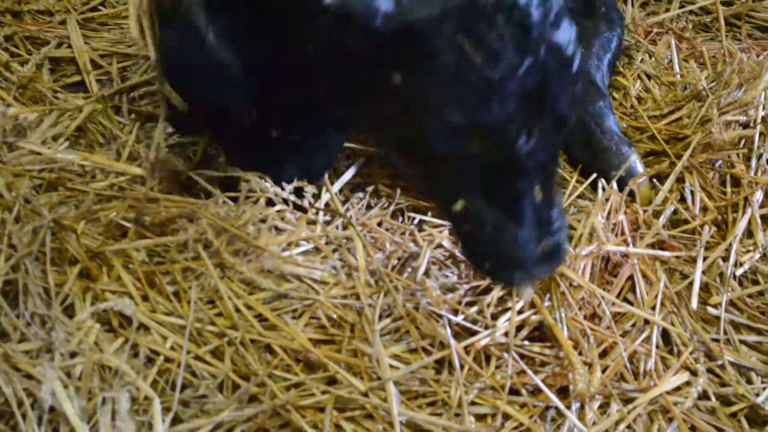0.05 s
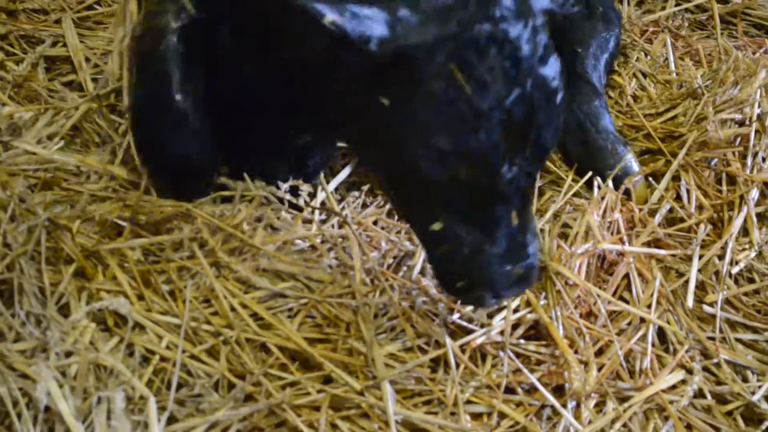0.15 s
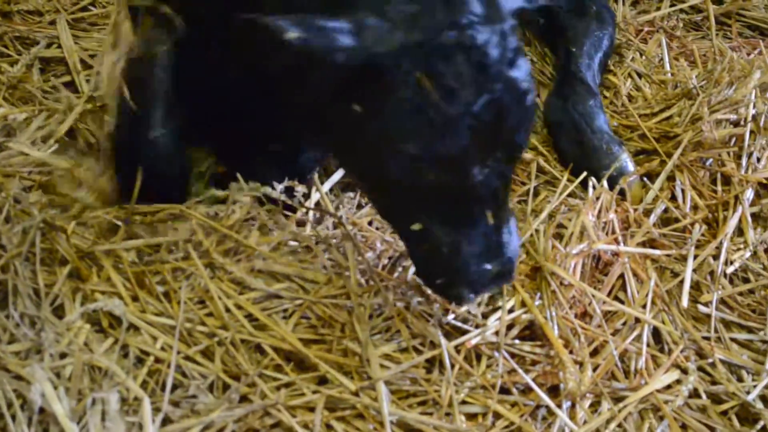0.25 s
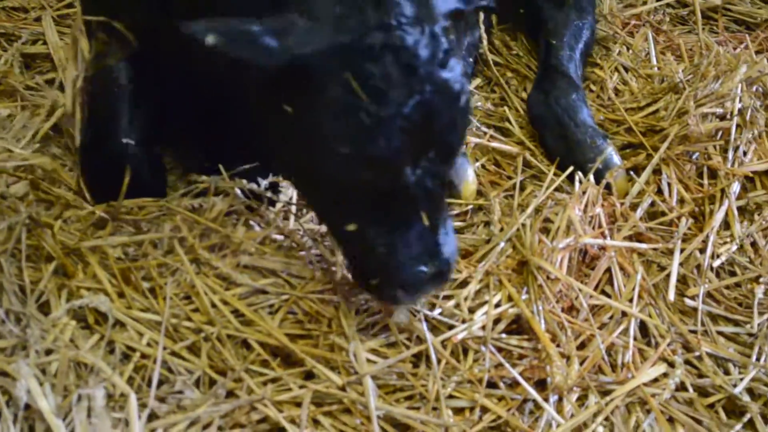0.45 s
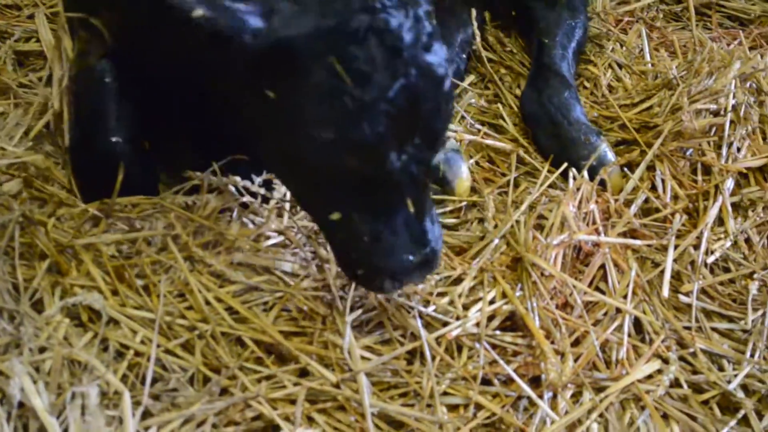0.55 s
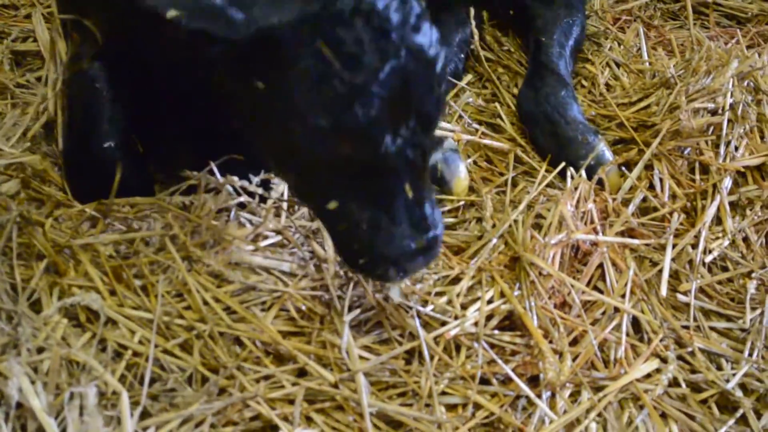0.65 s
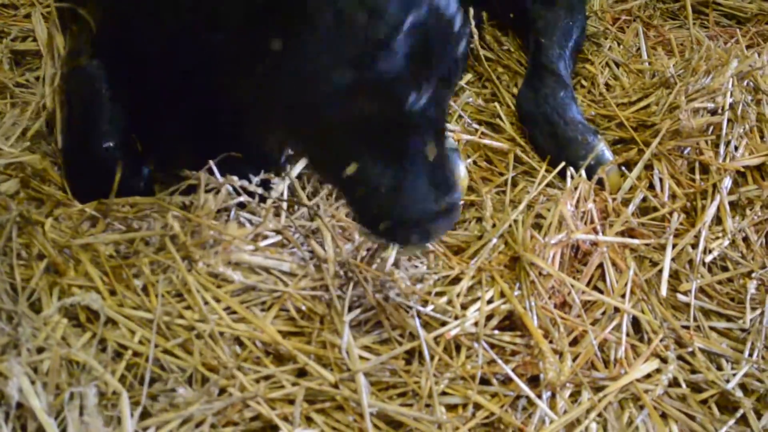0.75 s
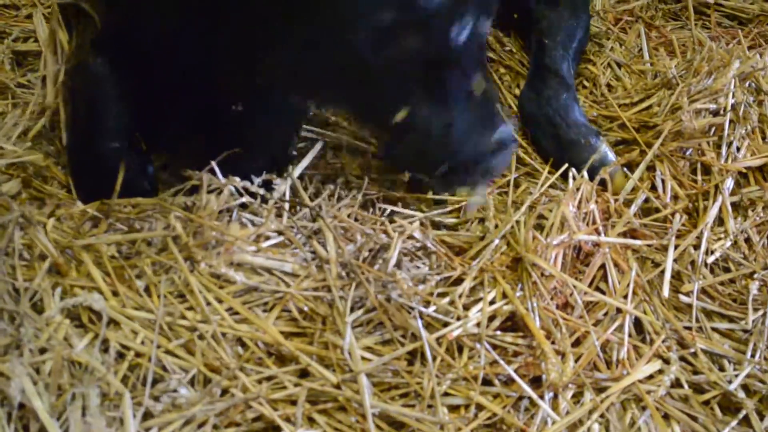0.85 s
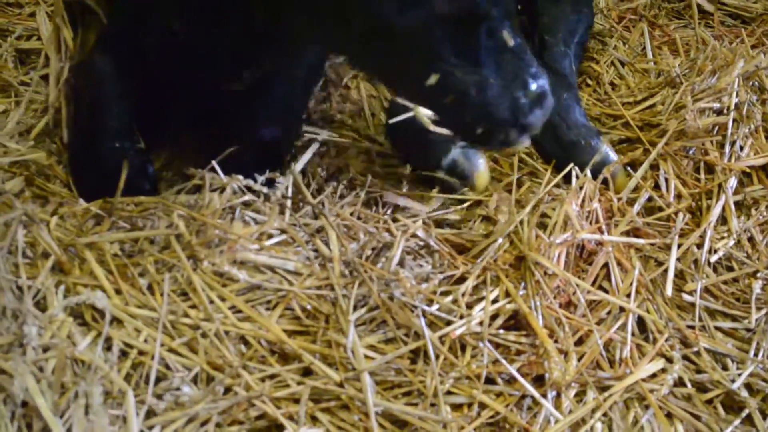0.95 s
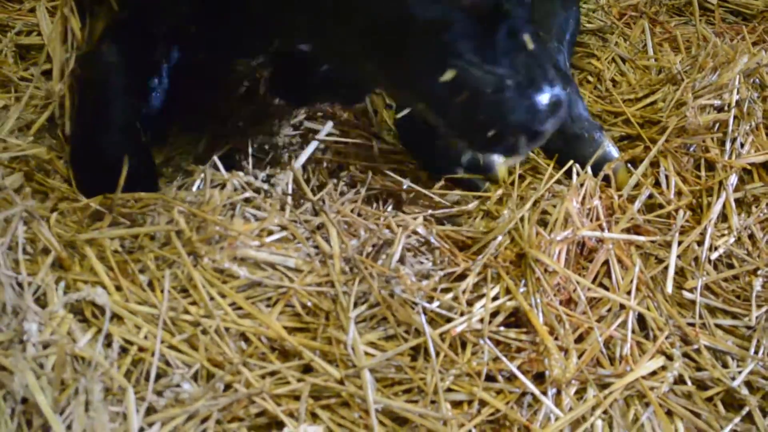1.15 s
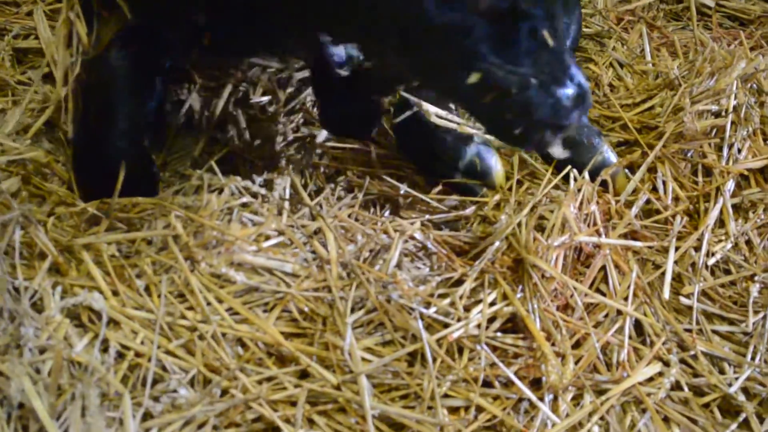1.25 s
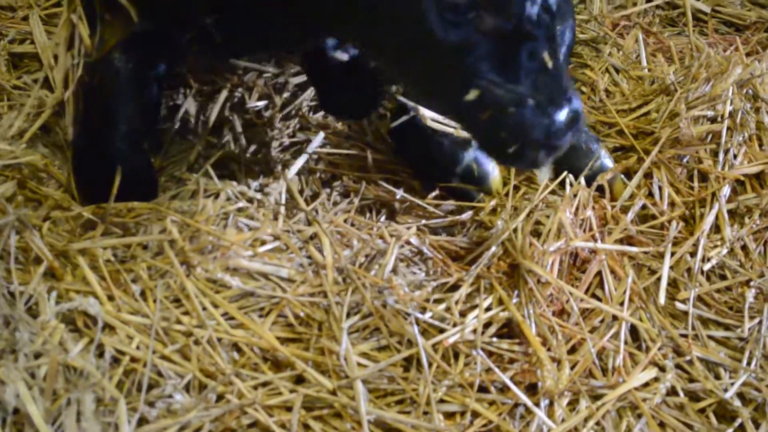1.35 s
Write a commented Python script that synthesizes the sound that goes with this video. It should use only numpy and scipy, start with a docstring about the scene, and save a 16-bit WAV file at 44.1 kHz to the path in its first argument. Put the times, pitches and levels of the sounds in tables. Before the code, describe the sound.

One heavy wooden thud echoes in a barn while a calf softly rustles straw.

```python
"""A thin ring, perhaps a gate, fades in a quiet barn while a calf shifts close by, crunching the straw.
A quarter second in comes one low, hollow thud, as of something heavy striking a wooden partition:
the boards ring under a short chatter of blows, and the barn answers with a booming tail.
As it dies away, duller bumps and scuffs come from the pen and the straw keeps rustling."""
import sys
import numpy as np
from scipy import signal
from scipy.fft import rfft, irfft
from scipy.io import wavfile

SR = 44100
rng = np.random.default_rng(int(sys.argv[2]) if len(sys.argv) > 2 else 0)


def bounce(signal):
    """Save signal as a 16-bit WAV file at the path given by the first command-line argument."""
    frames = np.transpose(np.atleast_2d(signal))
    limited = np.clip(frames, -1, 1)
    pcm = np.round(limited * 32767).astype(np.int16)
    wavfile.write(sys.argv[1], SR, pcm)


N = 61739

# The blows of the thud. Each row: start in seconds, relative level in dB, contact time in seconds.
THUD_BLOWS = [(0.246, -7.5, 0.0014), (0.2499, 4, 0.0014), (0.2562, -4.5, 0.00036), (0.2701, -3, 0.0012),
              (0.2881, -15.5, 0.00095), (0.3044, -1, 0.0021), (0.3262, -5, 0.0016), (0.4011, -7, 0.00272)]


def thud():
    """A soft, heavy blow and its chatter set the wooden partition ringing."""
    # The boards' modes. Each row: pitch in Hz, relative level in dB, 60 dB decay time in seconds.
    board_modes = [(86, -18, 1.0), (134, -11, .6), (147.5, -15, .22), (164, -15, .85), (199, -11, .62),
                   (233, -10, .66), (273, -3, .32), (335, -17, .45), (495, 6, .02), (670, -8, .22),
                   (787, -7, .14), (950, -5, .04), (1075, -2, .09)]
    force = 0
    for start, db, contact in THUD_BLOWS:
        pulse = np.sin(np.pi * np.minimum(since(start) / contact, 1))
        force = force + undb(db) * pulse / pulse.sum()
    boards = resonate(force, board_modes)
    return undb(-12.5) * highpass(boards, hz=102)  # the boards radiate little deep bass


def barn_boom():
    """The barn answers the thud with bands of noise; the lows hang on longest."""
    # Each row: band centre in Hz, level in dB, 60 dB decay time in seconds.
    tail_bands = [(57.4, -49, 2.1), (84.7, -27.5, 1), (150.3, -20.5, 0.95), (216, -26, 1.14),
                  (320, -23, 0.63), (442, -29.5, 0.6), (674, -27, 0.51), (823, -31.5, 0.2),
                  (1340, -36.5, 0.14)]
    start = THUD_BLOWS[0][0]
    return sum(undb(db) * noise_band(hz) * swell(start, rise=0.0047, t60=t60)
               for hz, db, t60 in tail_bands)


def pen_bumps():
    """Dull knocks and scuffs from the pen, each with a short hollow ring."""
    # Each row: start in seconds, knock and scuff levels in dB, rise and 60 dB decay times in seconds.
    hits = [(0.129, -43.5, -42, 0.004, 0.9), (0.563, -34.5, -49, 0.015, 0.17),
            (0.868, -53, -38, .005, 0.24), (0.895, -42, -37.5, .003, 0.65),
            (0.972, -40, -48.5, 0.013, 0.38), (1.265, -41, -35, 0.012, 0.41),
            (1.314, -51, -43, 0.0082, 0.54)]
    # A bassy knock and a midrange scuff. Each row: frequency in Hz, relative level in dB.
    knock_colour = [(60, -35), (120, -5.5), (200, -0.5), (300, -6), (500, -25.5), (1000, -60)]
    scuff_colour = [(120, -53), (280, -4.5), (420, 1.5), (560, 1), (700, -2), (1400, -9.5), (2500, -19.5),
                    (5000, -68)]
    # Each row: pitch in Hz, level against the scuff in dB, 60 dB decay time in seconds.
    hollow_modes = [(198.6, -4.5, 0.47), (438.7, -8.5, 0.32), (545.6, -1.5, 0.096)]
    starts, knock_db, scuff_db, rises, t60s = np.array(hits).T
    knocks = bursts(zip(starts, knock_db, rises, t60s), knock_colour)
    scuffs = bursts(zip(starts, scuff_db, rises, t60s), scuff_colour)
    hollow = 0
    for start, db, rise in zip(starts, scuff_db, rises):
        for hz, mode_db, t60 in hollow_modes:
            tone = np.sin(2 * np.pi * hz * since(start))
            hollow = hollow + undb(db + mode_db) * swell(start, rise, t60) * tone
    return knocks + scuffs + hollow


def ringing_bar():
    """Two light strokes on a bar leave a thin ring that flutters in pitch and level."""
    # Each row: start in seconds, level in dB, extra gain on the upper modes in dB.
    strokes = [(0.0, -29, -10.5), (0.061, -32, 1.5)]
    # Each row: pitch in Hz, level against the stroke in dB, 60 dB decay time in seconds.
    bar_modes = [(450.3, 1, 0.38), (1184, -1, 0.34), (1460, -9, 0.15), (2076, -19.5, 0.6)]
    flutter_depth, wobble_rad = .35, .55
    out = 0
    for start, db, bright_db in strokes:
        for k, (hz, mode_db, t60) in enumerate(bar_modes):
            flutter = 1 + flutter_depth * waver()
            tone = np.sin(2 * np.pi * hz * since(start) + wobble_rad * waver())
            gain = undb(db + mode_db + bright_db * (k > 0))
            out = out + gain * swell(start, rise=.009, t60=t60) * flutter * tone
    return out


def straw_rustle():
    """Stalks crunch under the calf, hiss as they slide and now and then snap."""
    # The rustle's contour. Each row: time in seconds, relative crunch and hiss levels in dB.
    contour = [(0.0, -44.5, -67), (0.108, -44, -63), (0.132, -48.5, -59.5), (0.182, -47.5, -69),
               (0.19, -51.5, -68), (0.236, -49, -61), (0.256, -47.5, -58), (0.288, -48, -56),
               (0.362, -50, -62), (0.424, -44.5, -58), (0.536, -59, -69), (0.664, -49, -61.5),
               (0.676, -40.5, -56.5), (0.77, -51.5, -60), (0.996, -47.5, -56.5), (1.102, -51.5, -61),
               (1.164, -50, -60.5), (1.222, -52.5, -68), (1.288, -49, -74), (1.296, -53, -70),
               (1.324, -47, -67.5), (1.4, -59, -67.5)]
    # Each row: start in seconds, level in dB, rise and 60 dB decay times in seconds.
    snaps = [(0.422, -54, 0.0029, 0.21), (0.562, -51.5, 0.0024, 0.031), (0.64, -52, 0.0013, 0.036),
             (0.668, -56.5, 0.014, 0.21), (1.148, -55, 0.0088, 0.21), (1.303, -56, 0.0072, 0.6)]
    # A midrange crunch, an airy hiss, a crisp snap. Each row: frequency in Hz, relative level in dB.
    crunch_colour = [(150, -20), (300, -8), (600, -6), (900, -2), (1300, 0), (1900, -3), (2500, -9),
                     (3400, -11), (4800, -22), (8000, -32), (15000, -50)]
    hiss_colour = [(2000, -3), (4000, -11.5), (6300, -7.5), (8500, -2), (11500, 0.5), (13500, -5),
                   (15500, -33)]
    snap_colour = [(800, -15), (2000, 5), (3900, 11.5), (5000, -13), (8500, 0), (12000, -41), (15500, -26)]
    times, crunch_db, hiss_db = np.array(contour).T
    crunch = undb(np.interp(since(0), times, crunch_db) + 3.5) * colour(crackle(), crunch_colour)
    hiss = undb(np.interp(since(0), times, hiss_db) + 0.5) * colour(crackle(), hiss_colour)
    return crunch + hiss + bursts(snaps, snap_colour)


def barn_air():
    """A quiet, steady bed of dark room tone."""
    # Each row: frequency in Hz, relative level in dB.
    air_colour = [(25, -4), (60, -7.5), (120, -4), (200, 0), (320, -1), (600, -13.5), (1200, -9.5),
                  (2500, -17.5), (5000, -38), (12000, -38)]
    return undb(-48.5) * colour(rng.standard_normal(N), air_colour)


def resonate(force, modes):
    """A force drives modes that ring on as decaying sines."""
    t = since(0)
    response = sum(undb(db) * fade(t, t60) * np.sin(2 * np.pi * hz * t) for hz, db, t60 in modes)
    return signal.fftconvolve(force, response)[:N]


def bursts(events, points):
    """Coloured crackle that swells and dies with each event."""
    power = sum((undb(db) * swell(start, rise, t60)) ** 2 for start, db, rise, t60 in events)
    return np.sqrt(power) * colour(crackle(), points)


def crackle(snaps_per_s=4500, spread_db=2.8, smear_s=.0011):
    """Dense tiny snaps of unequal size, each smeared into a grain of noise."""
    fires = rng.random(N) < snaps_per_s / SR
    size = np.minimum(rng.exponential(size=N), 6)
    snaps = fires * undb(spread_db * size)
    power = signal.lfilter([1], [1, -np.exp(-1 / (smear_s * SR))], snaps ** 2)
    return np.sqrt(power) * rng.standard_normal(N)


def noise_band(hz):
    """Noise a little over half an octave wide; rms 1."""
    sos = signal.butter(3, [hz / 1.22, hz * 1.22], "band", fs=SR, output="sos")
    return unit(signal.sosfilt(sos, rng.standard_normal(N)))


def waver(cutoff_hz=55):
    """A quick random wobble; rms 1."""
    sos = signal.butter(2, cutoff_hz, fs=SR, output="sos")
    return unit(signal.sosfilt(sos, rng.standard_normal(N)))


def colour(x, points):
    """Shape a sound with an EQ curve through (Hz, dB) points; rms 1."""
    hz, db = np.array(points).T
    bin_hz = np.maximum(np.arange(N // 2 + 1) * SR / N, 1)
    curve = undb(np.interp(np.log(bin_hz), np.log(hz), db))
    return unit(irfft(rfft(x) * curve, N))


def highpass(x, hz):
    """Roll off the bass below hz, 12 dB an octave."""
    return signal.sosfilt(signal.butter(2, hz, "high", fs=SR, output="sos"), x)


def swell(start, rise, t60):
    """A straight attack, then a decay; times in seconds."""
    t = since(start)
    return np.minimum(t / rise, 1) * fade(np.maximum(t - rise, 0), t60)


def fade(t, t60):
    """Exponential decay, 60 dB down after t60."""
    return np.exp(-np.log(1000) * t / t60)


def since(start):
    """Seconds since a moment, zero before it."""
    return np.maximum(np.arange(N) / SR - start, 0)


def undb(db):
    """Decibels to gain."""
    return 10 ** (np.asarray(db) / 20)


def unit(x):
    """Scale to rms 1."""
    return x / np.sqrt(np.mean(x ** 2))


def scene():
    """The thud and the smaller sounds of the barn over its quiet air, in mono."""
    return (thud() + barn_boom() + pen_bumps() + ringing_bar() + straw_rustle() + barn_air())[None]


def record(dry):
    """Thin the deepest bass and cut the very top steeply."""
    top_hz = 15650
    high_cut = signal.ellip(10, .2, 80, top_hz, fs=SR, output="sos")
    return signal.sosfilt(high_cut, highpass(dry, hz=49))


dry = scene()
out = record(dry)
bounce(out)
```